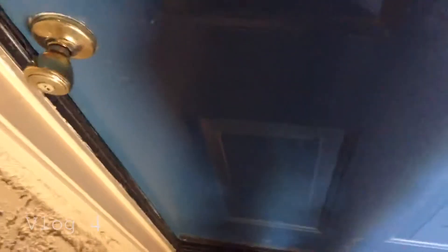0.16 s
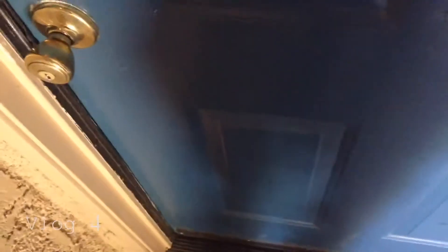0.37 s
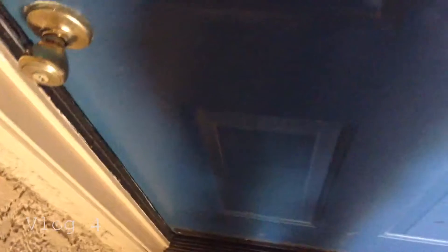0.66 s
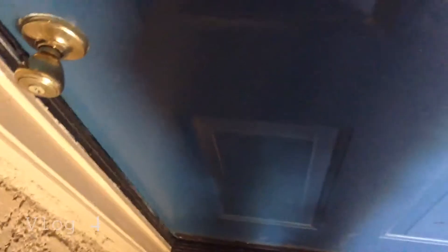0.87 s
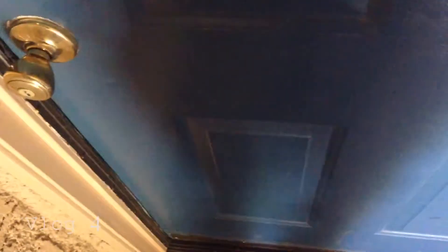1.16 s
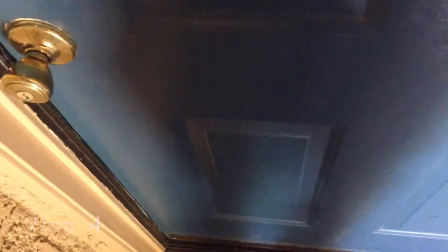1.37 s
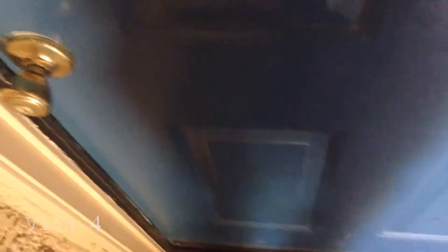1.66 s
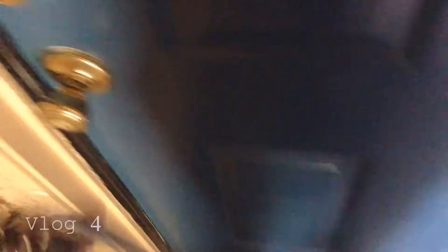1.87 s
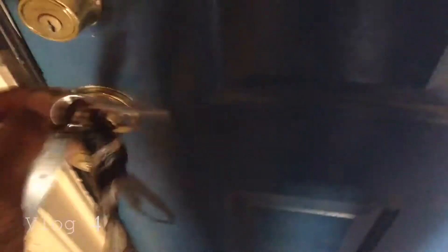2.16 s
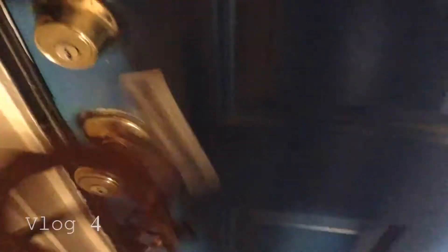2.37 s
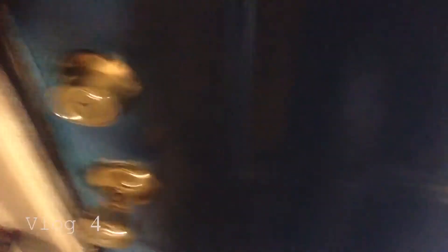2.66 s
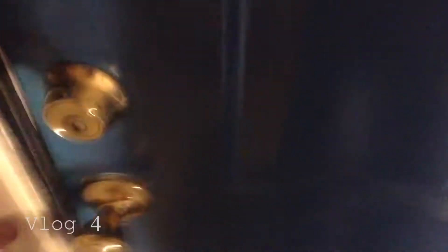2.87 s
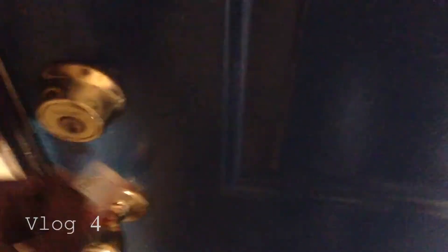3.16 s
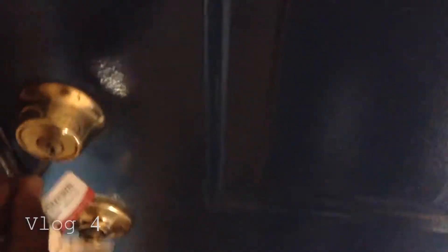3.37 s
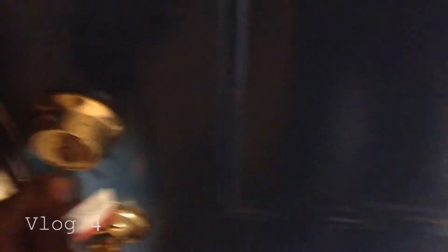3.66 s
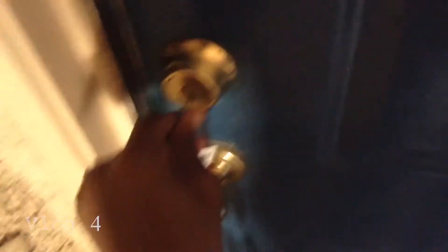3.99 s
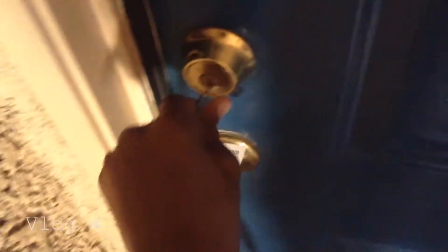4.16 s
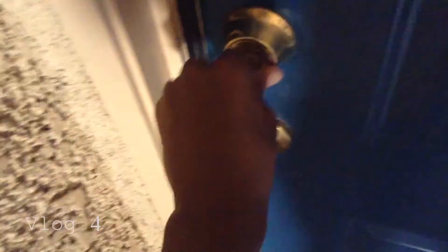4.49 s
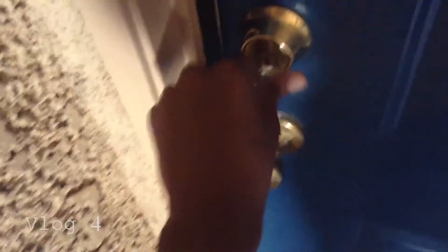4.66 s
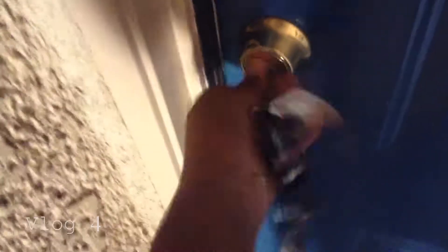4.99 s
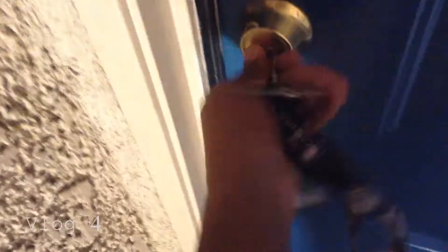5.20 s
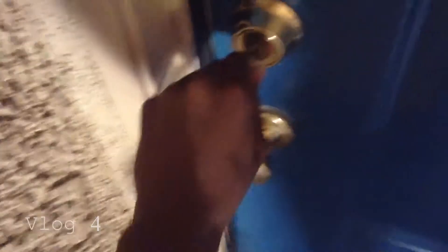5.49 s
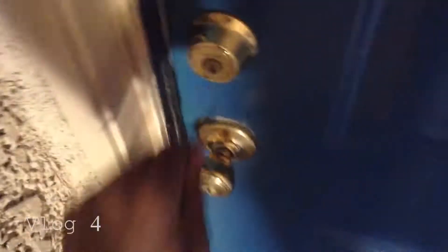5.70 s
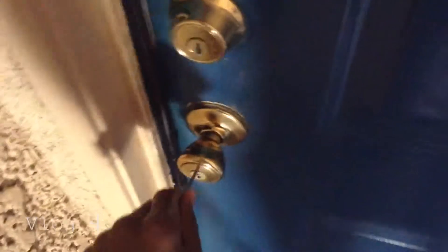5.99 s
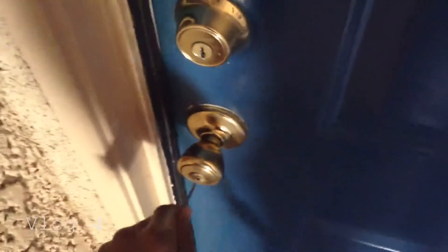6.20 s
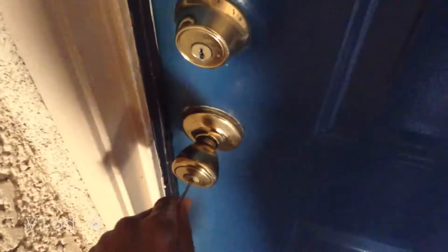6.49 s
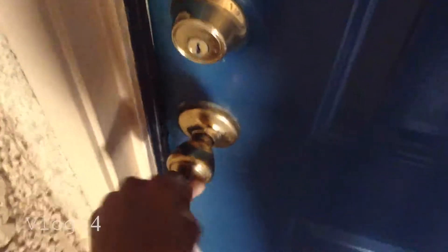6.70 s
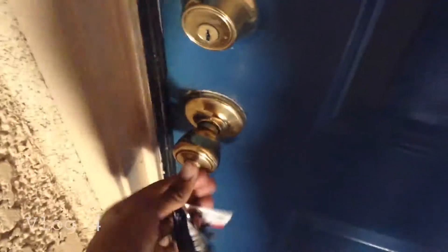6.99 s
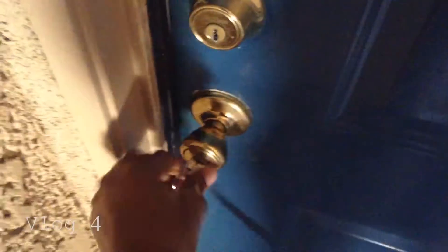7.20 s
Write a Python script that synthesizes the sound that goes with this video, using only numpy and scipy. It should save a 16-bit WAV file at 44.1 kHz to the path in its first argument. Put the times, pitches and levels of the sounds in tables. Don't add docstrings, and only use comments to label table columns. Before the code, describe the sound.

Close to a phone microphone on a porch, a bunch of keys jingles lightly, then rattles hard and bright as it is sorted in the hand. Keys tap a brass lock and knob, a quieter fumble follows, then a key scrapes into the deadbolt and turns with clacks and low wooden knocks. Lighter ticks and a last clatter come at the knob. A low outdoor hum lies underneath.

```python
import sys
import numpy as np
from scipy import signal
from scipy.fft import rfft, irfft, next_fast_len
from scipy.io import wavfile
from scipy.ndimage import uniform_filter1d

SR = 44100
rng = np.random.default_rng(int(sys.argv[2]) if len(sys.argv) > 2 else 0)


def transcribe(signal):
    frames = np.atleast_2d(signal).T
    limited = np.clip(frames, -1, 1)
    pcm = np.round(limited * 32767).astype(np.int16)
    wavfile.write(sys.argv[1], SR, pcm)


def decibels_to_gain(level_db):
    exponent = np.asarray(level_db, float) / 20
    return 10 ** exponent


N = 323694

# f/Hz, density/dB per Hz
HUM_COLOUR = [(25, -47.5), (80, -26.5), (100, -16), (116, -1.5), (141, -7.5), (166, -3.5), (229, -10.5),
              (354, -17.5), (734, -19), (962, -15.5), (1330, -23), (1800, -28.5), (4000, -40), (6000, -49),
              (16000, -59)]
# f/Hz, width/Hz, level/dB
HUM_MACHINES = [(119, 14, -80), (169.6, 11, -66.5), (231, 11, -62), (292.2, 54, -62)]
# f/Hz, T60/s
PORCH_DECAY = [(500, 0.45), (2000, 0.18), (6000, 0.16), (14000, 0.12)]

# t at top/s, level/dB, build-up/s, die-away/s, dullness/dB
STROKES = [(.02, -53.5, 2, 1.1, 6.5), (.45, -51, 3.4, 0.33, -39), (.76, -49, 0.92, 0.63, 8),
           (1.151, -60, 0.44, 1.54, 11.5), (1.65, -55.5, 0.49, 0.93, 1.5), (1.9, -41.5, 0.17, 0.87, -6),
           (2.12, -62, 0.69, 2.9, 9.5), (2.48, -38, 0.15, 0.83, 9), (2.7, -37.5, 0.5, 1.4, -26),
           (2.97, -39.5, 0.39, 0.5, -11.5), (3.3, -59, 0.32, 0.5, 14), (3.55, -82, 0.12, 0.44, 43),
           (4.42, -56, 0.045, 1.2, 19), (4.9, -69.5, 2.7, 0.84, 3), (5.1, -34, 0.28, 0.25, 13.5),
           (5.419, -52, 0.5, 0.41, 17.5), (5.66, -51, 0.033, 0.6, 10.5), (6.68, -53.5, 0.12, 0.5, 17.5),
           (6.95, -50, 0.22, 1, -6), (7.33, -40.5, 0.29, 1.2, 1.5)]
# f/Hz, density/dB per Hz
RUB_COLOUR = [(240, -31), (400, -10.5), (730, -7.5), (2670, 0), (3810, -3), (5960, -3), (7400, -3),
              (13900, -12.5), (15300, -9.5), (16000, -25.5)]

# f/Hz, width/Hz, level/dB
LOCK_BODY = [(1034, 220, 4), (1660, 32, 1), (2120, 120, 1.5), (3300, 250, 2)]
# f/Hz, width/Hz, level/dB
KEY_BODY = [(4500, 240, -3.5), (6580, 1600, 0.5), (9020, 1700, 1), (11500, 300, -9)]

# t/s, blow/dB, strongest f/Hz, lock share/dB
EDGE_TICKS = [(.4529, -22, 4870, -22), (.5001, -12.5, 5120, -20), (.7934, -30, 11100, -21),
              (1.7644, -22, 9020, -14), (1.8788, -3, 11600, -20), (1.9316, -12, 9700, -43),
              (1.977, -6, 10850, -34), (2.093, -23, 8900, -32.5), (2.2293, -19, 7500, -29),
              (2.6444, -5.5, 11600, -39.5), (2.6967, -16, 6290, -39), (2.7181, 8.5, 9260, -32),
              (2.818, -11, 5600, -14), (2.9438, -3, 5040, -17), (3.041, -6, 12100, -10.5),
              (3.103, -17, 9150, -57.5), (3.2946, -7.5, 3130, -1.5), (3.3593, -22, 6400, -8),
              (4.4356, -38, 1660, -6), (4.5615, -21.5, 2960, -17.5), (4.5999, -9.5, 10850, -13),
              (4.664, -9.5, 3150, -12), (4.806, -28.5, 9200, -12.5), (5.0707, 7, 2010, -3),
              (5.472, -32, 2760, -27.5), (6.6336, -25, 12900, -7), (6.7066, -11.5, 12700, -36),
              (7.2844, -22, 11560, -2), (7.3079, -18.5, 6200, -7)]
# t/s, blow/dB, strongest f/Hz, lock share/dB
FLAT_TAPS = [(.39, -8.5, 8800, -35), (.574, -32, 2580, -5), (.6393, -30, 11800, -39),
             (1.127, -14, 3250, -19), (1.1708, -30, 7700, -36), (.3855, -20, 4500, -20),
             (1.5371, -22, 9000, -32), (1.617, -17.5, 2850, -10), (2.0064, -2, 9200, -41),
             (2.0687, -13, 9050, -37), (2.583, -6, 11700, -13.5), (2.6135, -8, 11500, -20),
             (2.6747, -13.5, 4700, -47), (2.849, -13.5, 8560, -11.5), (2.372, -29.5, 4130, -9),
             (3.082, -21.5, 3930, -13), (3.275, -20, 5170, -49), (3.4927, -5, 2112, -12.5),
             (4.749, -23, 4370, -15), (4.8812, -27, 9200, -10), (5.3253, -25.5, 3300, -22),
             (5.3557, -22.5, 8740, -36), (5.4069, -17.5, 3000, -7), (5.4187, -17.5, 3000, -13),
             (5.4406, -18.5, 3220, -17), (5.9594, -48, 1500, -11), (6.4639, -37, 4760, -4),
             (6.4888, -38, 1490, 3), (6.8903, -37, 3160, -9), (7.231, -12.5, 1950, 2)]
# t/s, blow/dB, strongest f/Hz, lock share/dB
MUFFLED_KNOCKS = [(.5377, -28, 5550, -20), (.6984, -6.5, 2570, -16), (.901, -35.5, 3080, -14),
                  (.993, -35, 4270, -24), (1.0623, -24, 9200, -35), (1.07, -15.5, 4400, -36),
                  (1.0927, -37, 4330, -32), (1.1894, -29.5, 2120, -15), (1.228, -27.5, 2200, -19),
                  (1.3675, -34.5, 4700, -21), (1.713, -32, 4240, -17), (2.4606, -9.5, 3140, -13),
                  (2.6289, -12.5, 11500, -11), (2.7993, -12.5, 9400, -25), (3.2166, -27, 5200, -20),
                  (3.6684, -33.5, 2830, -3.5), (3.7811, -45, 2576, -1.5), (4.0868, -41, 570, 4),
                  (4.1082, -39, 1950, -8.5), (4.4062, -31, 2690, -5.5), (5.205, -28, 2820, -2),
                  (5.23, -25.5, 4500, -39.5), (5.2722, -25, 8800, -30), (5.3702, -22.5, 8560, -23),
                  (5.4048, -21.5, 1525, -3), (6.3847, -48.5, 1520, 1), (6.6188, -40, 4900, -9),
                  (7.138, -35, 1940, 6), (7.1646, -31.5, 2000, -10), (7.3189, -16.5, 2350, -4)]
# t/s, blow/dB, strongest f/Hz, lock share/dB, T60/s
BRIGHT_RATTLES = [(.125, -29.5, 11500, -34, 0.17), (.336, -24, 11400, -16, 0.19),
                  (1.288, -39, 8800, -25, 0.071), (1.62, -13.5, 9260, -12, 0.031),
                  (.6925, -19, 4100, -40, 0.0091), (2.934, -10, 4760, -8.5, 0.016),
                  (3.5845, -34.5, 3425, -12, 0.064), (4.5056, -14.5, 6250, -8, 0.09),
                  (5.635, -27.5, 3300, -3, 0.077), (4.9935, -19, 3120, -4, 0.071),
                  (5.0546, -17, 9600, -28, 0.094), (5.6516, -18, 2880, -4.5, 0.067),
                  (5.6776, -8.5, 2790, -8, 0.066), (6.6521, -28.5, 4536, -1, 0.034),
                  (6.6767, -17.5, 9040, -34, 0.022), (6.6953, -18.5, 11600, -30, 0.11),
                  (6.7304, -23, 2370, 3, 0.2)]
# t/s, blow/dB, strongest f/Hz, lock share/dB, T60/s
CLANKS = [(.0722, -32.5, 2010, -8, 0.15), (.1557, -17, 9080, -72, 0.035), (.3056, -25.5, 5140, -16.5, 0.1),
          (1.0384, -40.5, 2060, -1, 0.11), (1.108, -11.5, 7700, -36, 0.045),
          (1.5687, -30.5, 2170, -6.5, 0.053), (1.8559, -16.5, 5350, -17, 0.081),
          (2.1929, -25, 9200, -26, 0.058), (2.5235, -10, 2130, -14, 0.019), (2.976, -15, 4730, -40, 0.043),
          (3.1712, -24.5, 9450, -31, .035), (4.1922, -35, 4250, -10, 0.063),
          (4.208, -33.5, 4490, -10.5, 0.11), (4.473, -13, 5800, -14, 0.038), (4.8375, -27, 3050, -4, 0.064),
          (4.8497, -23.5, 1660, -1.5, 0.032), (4.9999, -14, 1986, -11.5, 0.25),
          (5.2945, -25, 2024, -1.5, 0.066), (5.8514, -39, 1515, -23, 0.058),
          (6.935, -16, 7270, -10.5, 0.012), (6.9873, -13, 6580, -19.5, .034), (7.056, -26, 3030, -3, 0.068),
          (7.1883, -22.5, 2260, -5, 0.095), (7.2188, -10, 1770, -8, 0.057)]
# t/s, blow/dB, strongest f/Hz, lock share/dB
LIGHT_TICKS = [(.3155, -24.5, 8800, -22), (.343, -26.5, 6400, -22), (.3726, -22, 4600, -21.5),
               (.4074, -18, 11500, -25), (.4424, -27, 9000, -25), (.626, -28.5, 9160, -19.5),
               (.66, -29, 8810, -21.5), (.7024, -9.5, 2760, -19), (.7654, -27, 4530, -25),
               (1.055, -25, 2300, -16), (1.134, -14, 3540, -25), (1.1954, -27, 2060, -25),
               (1.2074, -24, 2060, -25), (1.3844, -30, 4430, -30), (1.8606, -16, 9000, -24.5),
               (1.888, -8, 6430, -26), (1.8984, -14, 9210, -25), (1.9281, -13, 9480, -28),
               (1.957, -17, 6070, -22), (2.0284, -11, 3300, -15.5), (2.0774, -11, 6500, -25),
               (2.1134, -25, 9000, -25), (2.168, -26.5, 9000, -25), (2.3545, -28, 4560, -18),
               (2.4542, -16, 9000, -22), (2.4672, -7, 3260, -14), (2.5158, -9, 4386, -15),
               (2.5288, -9, 8000, -18), (2.562, -14, 11450, -25), (2.5771, -13, 11500, -21.5),
               (2.5874, -7, 8000, -18.5), (2.6214, -13, 6000, -18.5), (2.6575, -14, 9200, -23),
               (2.7103, -17, 11000, -25), (2.7374, -15, 9200, -25), (3.1974, -32, 4000, -14),
               (3.2855, -21, 4600, -20), (3.4984, -8, 2000, -13), (4.966, -30, 5200, -30),
               (4.9845, -22, 2900, -8), (5.0473, -13, 6300, -14), (5.0774, -8, 2110, -6),
               (5.1134, -18, 3300, -8), (5.1547, -24, 3210, -12), (6.5314, -44, 2300, -8),
               (6.7944, -36, 2800, -6)]
# t/s, blow/dB, strongest f/Hz
MORE_TICKS = [(.002, -30, 9000), (.02, -32, 5800), (.05, -34, 5700), (.086, -28, 2000), (.18, -29, 6000),
              (.4965, -24, 12000), (1.523, -34, 9100), (1.563, -36, 9000), (1.607, -30, 9200),
              (1.6245, -10, 9300), (1.634, -16, 4500), (1.808, -33, 8500), (1.827, -31, 9300),
              (2.762, -20, 6500), (2.79, -22, 5500), (2.812, -19, 9200), (2.899, -27, 6800), (2.987, -19, 7200),
              (3.035, -22, 7000), (3.047, -12, 9500), (4.431, -30, 3000), (4.443, -28, 6000),
              (4.458, -27, 6000), (4.527, -20, 9200), (4.779, -32, 11400), (5.3, -25, 2200),
              (5.389, -27, 14000), (5.641, -20, 8500), (5.666, -15, 9000), (5.7, -18, 9500),
              (6.661, -20, 12000), (6.925, -30, 2700), (6.962, -30, 14500), (7.05, -28, 2500),
              (7.225, -14, 2000)]
# t/s, blow/dB, strongest f/Hz
BRUSHES = [
    (2.503, -18, 11500),
    (3.868, -55, 9000),
    (6.454, -46, 12500),
    (6.672, -26, 13500),
    (6.69, -24, 14000),
]

# f/Hz, level/dB
THIN_KEY = [(0.335, -43, 0.11, .05), (0.391, -24, 0.16, 0.022), (1.1094, -11, 0.027, .03),
            (1.742, -49, 0.35, 0.027), (2.372, -46, 0.06, .04), (2.53, -27, 0.41, 0.05),
            (2.584, -19.5, 0.17, 0.015), (2.62, -25.5, .2, .034), (2.6292, -10.5, 0.075, .026),
            (2.719, -9.5, 0.076, .06), (3.0155, -29, 0.39, .06), (3.2166, -44, 0.3, 0.037)]
THIN_MODES = [(11560, -3), (13900, -12), (8040, -14)]
LONG_KEY = [
    (0.3915, -20, 0.027, .05),
    (1.929, -22, 0.062, .012),
    (2.0687, -22, 0.047, .03),
    (2.7202, -8, 0.043, .02),
    (3.1024, -32.5, 0.027, 0.06),
    (5.3717, -25, 0.016, .05),
]
LONG_MODES = [(9060, -1.5), (9480, -1)]
RING = [
    (3.2171, -37, 0.11, .06),
]
RING_MODES = [(4990, 0), (6370, -5)]
FOB = [
    (2.012, -42, 0.6, .13),
    (3.2171, -49, .25, .07),
]
FOB_MODES = [(3770, 0)]
KNOB = [
    (3.2935, -25, 0.04, .1),
    (3.492, -24, 0.035, .05),
    (5.0716, -19, 0.045, .1),
]
KNOB_MODES = [(1170, -2), (1660, -3), (2090, -3), (3300, -3)]
CAP = [
    (2.008, -29.5, 0.07, 0.044),
    (2.069, -31.5, 0.079, .035),
]
CAP_MODES = [(2700, -1), (4450, -2)]
SMALL_KEY = [
    (2.334, -43.5, 0.23, 0.089),
    (2.475, -34.5, .06, 0.0184),
]
SMALL_MODES = [(10680, -6.5), (13900, -6.5)]
BARREL = [
    (3.2945, -40, .35, .11),
    (5.073, -31, .2, .06),
]
BARREL_MODES = [(1655, 0), (1165, 0), (1605, -2), (1130, -3)]
BROAD_KEY = [
    (1.1094, -20, .09, .07),
]
BROAD_MODES = [(13900, -4), (8120, -2), (8900, -5)]

# t/s, blow/dB, f/Hz
SNAPS = [
    (0.697, -6.5, 3940),
    (1.1282, -7, 3400),
    (1.9775, -15, 2150),
    (2.6288, -9, 3200),
    (4.0868, -38, 560),
    (4.664, -10, 11000),
    (5.678, -14, 2700),
    (6.7082, -10, 13700),
]

# t at top/s, push/dB, build-up/s, die-away/s
PUSHES = [(2.5, -42, 0.27, 0.55), (4.44, -43.5, 0.35, 7.5), (5.07, -44, 0.21, 0.49),
          (5.43, -46.5, 0.3, 0.29), (5.689, -33, 0.2, 0.27), (6.48, -39, 0.064, 0.26),
          (6.52, -44, .08, 0.13), (6.57, -54, 0.088, 0.15), (6.711, -32, 0.31, 0.45),
          (7.05, -62, 0.86, 2.6), (7.24, -41, 1.04, 5.2)]
# f/Hz, width/Hz, level/dB
DOOR_MODES = [(145.6, 5.5, 0.5), (199.2, 7, 2.5), (286.7, 48, -1), (359, 7.3, -6.5), (162, 7.7, -8),
              (600, 1000, -2.5)]
# t/s, level/dB, f/Hz, T60/s
THUDS = [
    (4.432, -24, 186, 0.18),
    (4.469, -27.5, 194, 0.22),
    (4.531, -31, 195, 0.31),
    (5.671, -32, 144.6, 1.2),
    (6.875, -44, 145.6, 0.66),
]

EDGE_DB, FLAT_DB, MUFFLED_DB, RATTLE_DB, CLANK_DB, LIGHT_DB = -1.5, -12, -28, -4, -12, -14.5
EDGE_T60, FLAT_T60, MUFFLED_T60, LIGHT_T60 = 0.02, 0.023, 0.03, 0.0081
MORE_TICKS_LOCK_DB = -20.5


def evened(x):
    return x / np.sqrt(np.mean(x ** 2) + 1e-20)


def read(points, hz):
    f, value = np.transpose(points)
    return np.interp(np.log(hz + 1), np.log(f + 1), value)


def add(mix, s, sound):
    part = mix[round(s * SR):][:len(sound)]
    part += sound[:len(part)]


def coloured(x, points):
    size = next_fast_len(N)
    gain = decibels_to_gain(read(points, np.fft.rfftfreq(size, 1 / SR)))
    return evened(irfft(rfft(x, size) * gain, size)[:N])


def resonate(x, hz, width):
    turn = np.exp(2j * np.pi * hz * np.arange(len(x)) / SR)
    r = np.exp(-np.pi * width / SR)
    return evened((turn * signal.lfilter([1 - r], [1, -r], x / turn)).real)


def modes(hz, db, t60, seconds):
    hz, db, t60 = (v[:, None] for v in np.broadcast_arrays(*np.atleast_1d(hz, db, t60)))
    t = np.arange(round(seconds * SR)) / SR
    return (decibels_to_gain(db - 60 * t / t60) * np.sin(2 * np.pi * hz * t)).sum(0)


def stroke(s, db, build, fade):
    late = np.arange(N) / SR - s
    return decibels_to_gain(db - 60 * np.where(late < 0, -late / max(build, .01), late / max(fade, .01)))


def hum():
    wash = decibels_to_gain(-56) * coloured(rng.standard_normal(N), HUM_COLOUR)
    wash *= decibels_to_gain(2.1 * resonate(rng.standard_normal(N), 0, 19.0))
    for hz, width, db in HUM_MACHINES:
        tone = resonate(rng.standard_normal(N), hz, width)
        wash += decibels_to_gain(db) * resonate(tone, hz, width)
    return wash


def porch(x):
    taps = np.zeros(SR // 2)
    at = np.arange(100, SR // 2 - 20, 20)
    sign = rng.choice([-1., 1.], len(at))
    taps[at + rng.integers(0, 20, len(at))] = sign
    hz, t, z = signal.stft(taps, SR, nperseg=128)
    t60 = np.maximum(read(PORCH_DECAY, hz), .03)[:, None]
    tail = signal.istft(z * decibels_to_gain(-60 * t / t60), SR, nperseg=128)[1]
    return signal.fftconvolve(x, tail / np.linalg.norm(tail))[:N]


def chinks(drive):
    key_hz = (4400, 5250, 6500, 8040, 8900, 9500, 10700, 11560, 12600, 14500)
    strength = decibels_to_gain(4 * np.minimum(rng.exponential(1, (len(key_hz), N)), 3))
    touches = strength * (rng.random((len(key_hz), N)) < 15 / SR)
    out = np.zeros(N)
    for touch, hz in zip(touches, key_hz):
        out += signal.oaconvolve(drive * touch, modes(hz, 0., .018, .05))[:N]
    return out


def rub():
    strength = decibels_to_gain(3.2 * np.minimum(rng.exponential(1, N), 3.5))
    slips = strength * (rng.random(N) < 260 / SR)
    scratch = signal.lfilter([1], [1, -np.exp(-1 / (0.0063 * SR))], slips) + .6
    grit = coloured(scratch * rng.standard_normal(N), RUB_COLOUR)
    dull = signal.filtfilt(*signal.butter(1, 3000, fs=SR), grit)
    swells = np.array([stroke(*row[:4]) for row in STROKES])
    level = swells.sum(0)
    dull_level = decibels_to_gain(np.array(STROKES)[:, 4]) @ swells
    loose = np.where(np.arange(N) / SR < 3.3, 1, .3)
    return level * (grit - dull) + dull_level * dull + decibels_to_gain(-7) * chinks(level * loose)


def contact_colour(f, hz, lock_db, sparkle_db, lumps):
    colour_db = read([(500, lock_db - 12), (1600, lock_db - 3.5), (2300, 0.8 * lock_db - 3.5),
                      (5000, -9.5), (11000, sparkle_db), (15500, sparkle_db - 6.5)], f)
    colour_db += 3.6 * evened(uniform_filter1d(lumps[:len(f)], size=50)) * np.minimum(f / 3000, 1)
    colour_db += 4 * np.exp(-((f - hz) / 350) ** 2)
    for body_hz, width, body_db in LOCK_BODY + KEY_BODY:
        colour_db += body_db * np.exp(-((f - body_hz) / width) ** 2)
    return colour_db - 0.44 * max(lock_db + 13, 0) * np.clip(f / 8000 - .5, 0, 1)


def clicks(blows, sparkle_db, count=5):
    size, lead = 4096, 32
    out, t, f = np.zeros(N), np.arange(size) / SR, np.fft.rfftfreq(size, 1 / SR)
    low = 1 / (1 + (f / 3000) ** 4)
    key_hz, _, key_db = np.transpose(KEY_BODY)
    chances = rng.random((len(blows), 2, count, 1))
    noises = rng.standard_normal((len(blows), 2, size))
    for (s, db, hz, lock_db, t60), (when, weakness), (noise, lumps) in zip(blows, chances, noises):
        t60 = np.clip(t60, .004, .15)
        colour_db = contact_colour(f, hz, lock_db, sparkle_db, lumps)
        spectrum = rfft(noise) * decibels_to_gain(colour_db)

        late = t - 0.51 * t60 * when
        bounces = (decibels_to_gain(-13 - 14 * weakness - 60 * abs(late) / .007) * (late > 0)).sum(0)
        shape = decibels_to_gain(7 - 60 * t / 0.0068) + bounces + decibels_to_gain(-6.5 - 60 * t / t60)
        linger = decibels_to_gain(-4 - 60 * t / (4.36 * t60))
        crack = irfft(spectrum * (1 - low)) * shape + irfft(spectrum * low) * (shape + linger)
        crack *= np.cos(np.pi / 2 * t / t[-1]) * np.minimum(t / 0.0025, 1)
        add(out, s, decibels_to_gain(db - 8) * crack / np.std(irfft(spectrum)))

        note = modes(hz, 0., min(0.8 * t60, .025), .04)
        add(out, s, decibels_to_gain(db - 13 - 4 * (hz < 7000)) * note)
        ping = modes(key_hz * (1 + lumps[:4] / 100), key_db + 4 * noise[:4], min(t60, .028), .04)
        add(out, s, decibels_to_gain(db - 34 - np.maximum(lock_db, -16)) * ping)
        tick = np.roll(irfft(decibels_to_gain(colour_db)), lead)[:2 * lead] * np.hanning(2 * lead)
        add(out, s, decibels_to_gain(db - 5) * tick / abs(tick).max())
    return out


def contacts():
    out = np.zeros(N)
    for rows, sparkle_db, t60 in ((EDGE_TICKS, EDGE_DB, EDGE_T60), (FLAT_TAPS, FLAT_DB, FLAT_T60),
                                  (MUFFLED_KNOCKS, MUFFLED_DB, MUFFLED_T60)):
        out += clicks([(*row, t60) for row in rows], sparkle_db)
    out += clicks(BRIGHT_RATTLES, RATTLE_DB)
    out += clicks(CLANKS, CLANK_DB)
    light = [(*row, LIGHT_T60) for row in LIGHT_TICKS + [(*row, MORE_TICKS_LOCK_DB) for row in MORE_TICKS]]
    return out + decibels_to_gain(-1.5) * clicks(light, LIGHT_DB, count=1)


def rings():
    out, t = np.zeros(N), np.arange(round(.4 * SR)) / SR
    for blows, key in ((THIN_KEY, THIN_MODES), (LONG_KEY, LONG_MODES), (RING, RING_MODES),
                       (FOB, FOB_MODES), (KNOB, KNOB_MODES), (CAP, CAP_MODES),
                       (SMALL_KEY, SMALL_MODES), (BARREL, BARREL_MODES), (BROAD_KEY, BROAD_MODES)):
        hz, mode_db = np.transpose(key)
        for s, db, t60, free in blows:
            ring = modes(hz, mode_db * (1 + rng.random(len(key))), np.clip(t60, .02, .8), .4)
            twin = modes(1.012 * hz, mode_db - 26, 3.5 * np.clip(t60, .02, .1), .4)
            muting_db = 20 * np.clip((t - free) / .006, 0, 1)
            add(out, s, decibels_to_gain(db - muting_db) * (ring + twin))
    return out


def snaps():
    out = np.zeros(N)
    rise = 1 - np.exp(-(np.arange(round(.01 * SR)) / SR / .0002) ** 2)
    for s, db, hz in SNAPS:
        pair = np.array([hz, 1.9 * hz if hz < 7000 else .65 * hz])
        add(out, s, decibels_to_gain(db + 2) * rise * modes(pair, [0., -3], .003 + 4 / pair, .01))
    return out


def brushes():
    return clicks([(*row, MORE_TICKS_LOCK_DB, LIGHT_T60) for row in BRUSHES], EDGE_DB, count=1)


def door():
    push = sum(stroke(*row) for row in PUSHES)
    panel = np.zeros(N)
    for hz, width, db in DOOR_MODES:
        panel += decibels_to_gain(db) * resonate(rng.standard_normal(N), hz, width)
    panel = signal.lfilter(*signal.butter(2, (100, 900), "bandpass", fs=SR), panel)
    return push * panel / np.sqrt(abs(uniform_filter1d(panel ** 2, size=2500)) + 1e-9)


def thuds():
    out, t = np.zeros(N), np.arange(SR // 2) / SR
    shape = np.minimum(t / 0.0048, 1) * (1 - 2 * t)
    for s, db, hz, t60 in THUDS:
        add(out, s, modes(hz, db, t60, .5) * shape)
    return out


def scene():
    highpass = signal.butter(3, 450, "highpass", fs=SR, output="sos")
    metal = signal.sosfilt(highpass, contacts() + rings() + snaps())
    rest = decibels_to_gain(-11) * porch(metal) + rub() + door() + thuds() + hum()
    return (metal + rest + brushes())[None]


def roll_off(x):
    return signal.sosfilt(signal.butter(12, 16460, fs=SR, output="sos"), x)


def record(dry):
    power_db = 10 * np.log10(abs(uniform_filter1d(dry[0] ** 2, 200)) + 1e-12)
    fall = np.arange(N) * 10.9 / SR
    over_db = np.maximum(np.maximum.accumulate(power_db + fall) - fall + 14.5, 0)
    ducked = dry / decibels_to_gain(0.75 * uniform_filter1d(over_db, 100))
    ducked = .75 * np.tanh(ducked / .75)
    ducked = ducked + decibels_to_gain(-82) * rng.standard_normal(N)
    edge = signal.firwin(301, 15480, window=("kaiser", 8), fs=SR)[None]
    return roll_off(signal.oaconvolve(ducked, edge, "same"))


dry = scene()
out = record(dry)
transcribe(out)
```